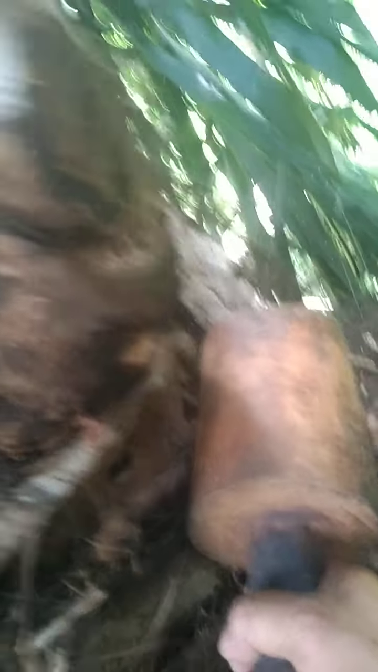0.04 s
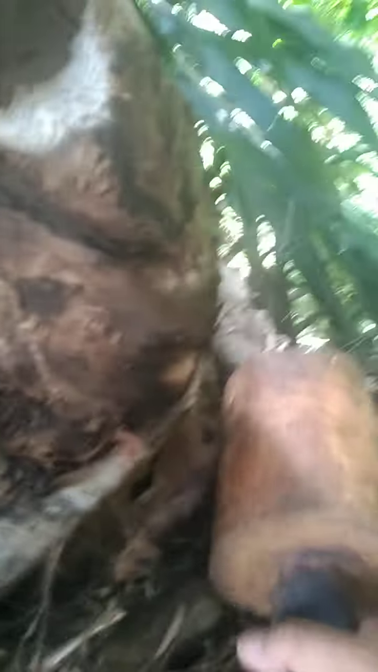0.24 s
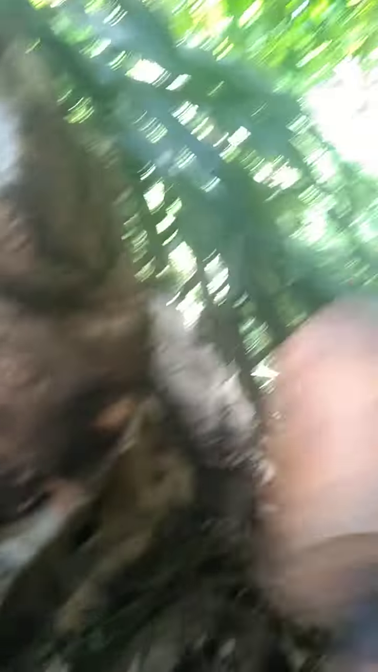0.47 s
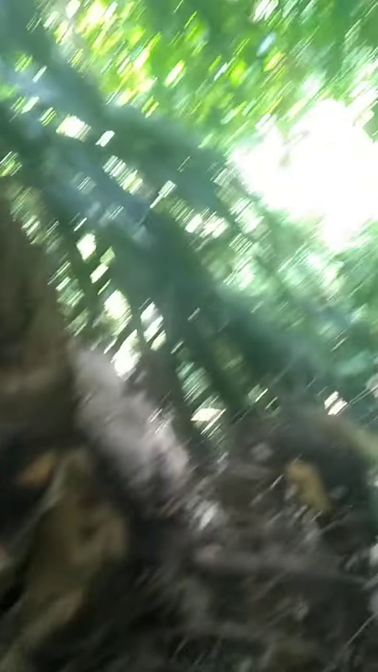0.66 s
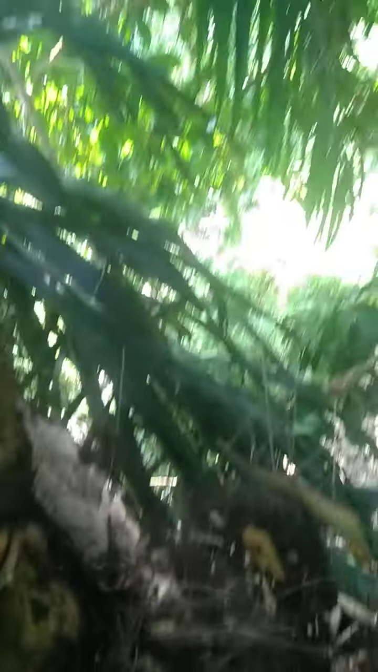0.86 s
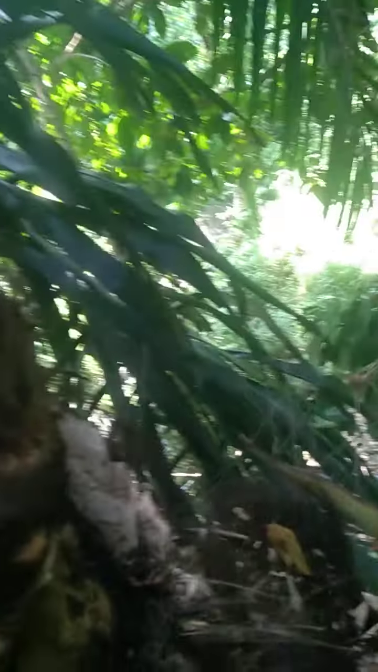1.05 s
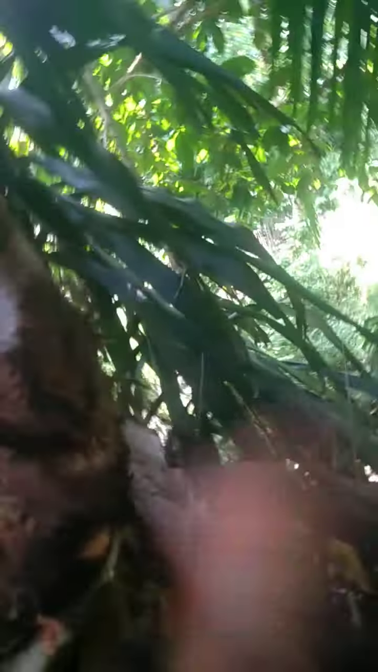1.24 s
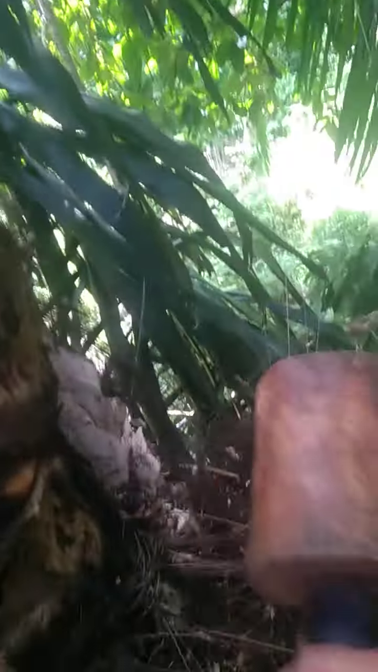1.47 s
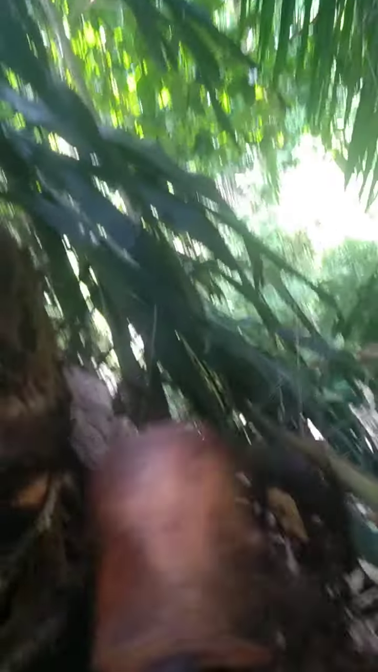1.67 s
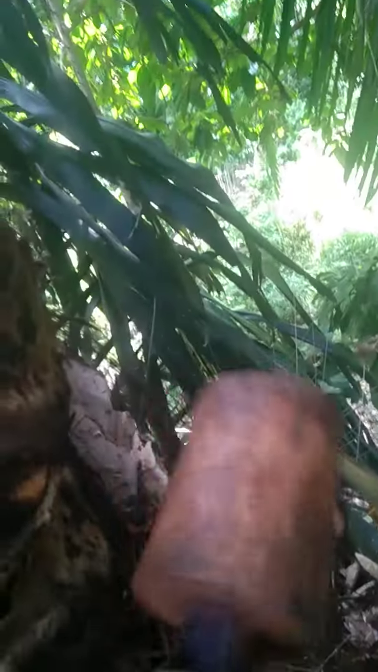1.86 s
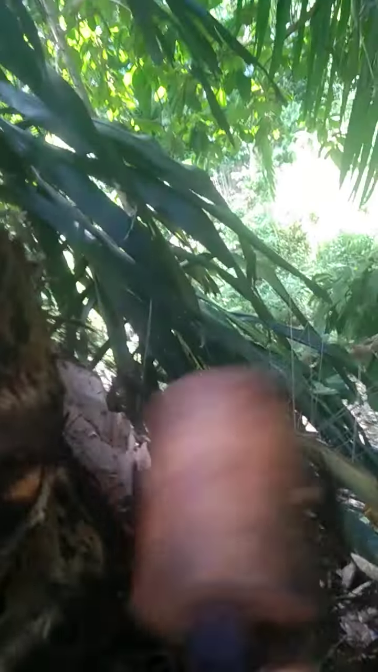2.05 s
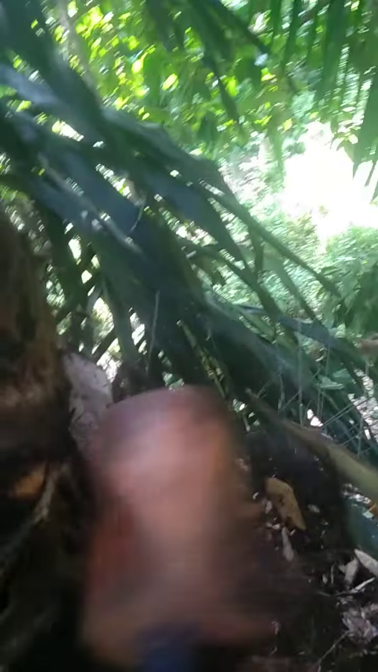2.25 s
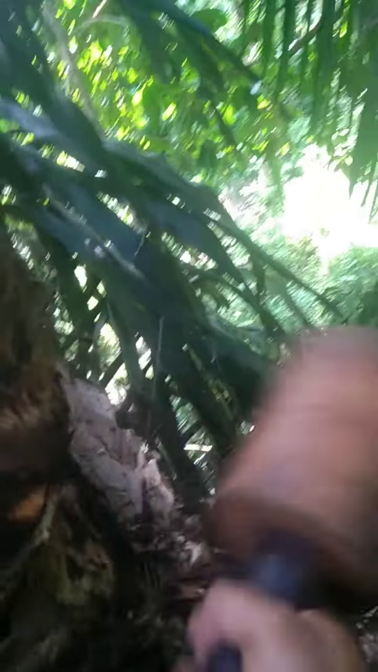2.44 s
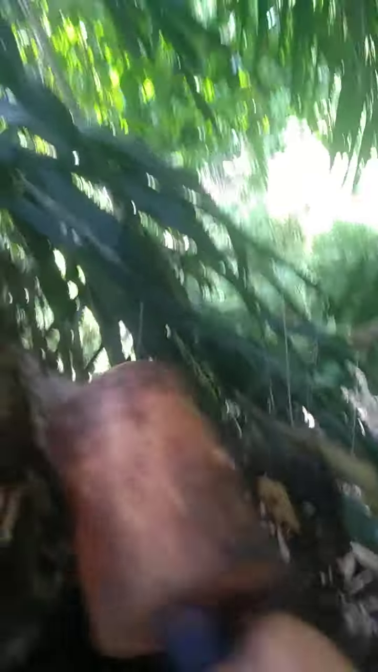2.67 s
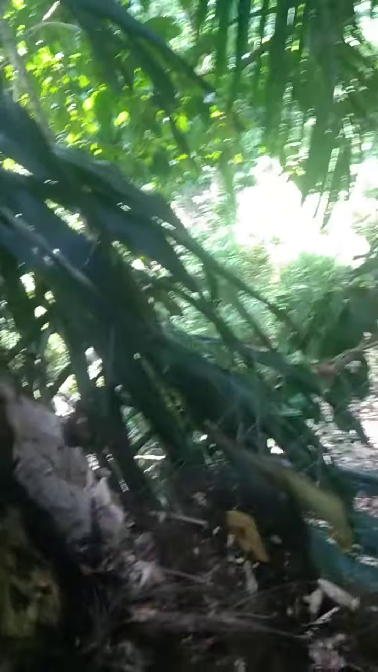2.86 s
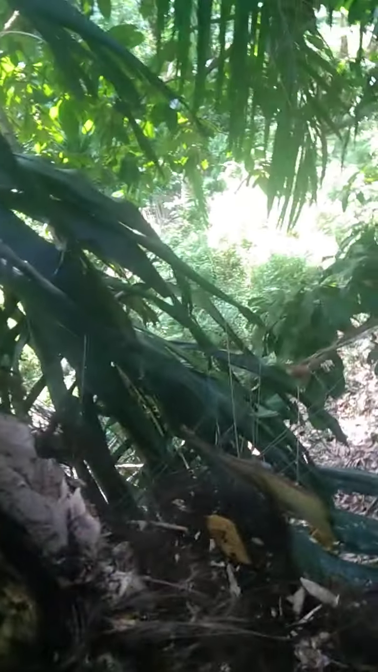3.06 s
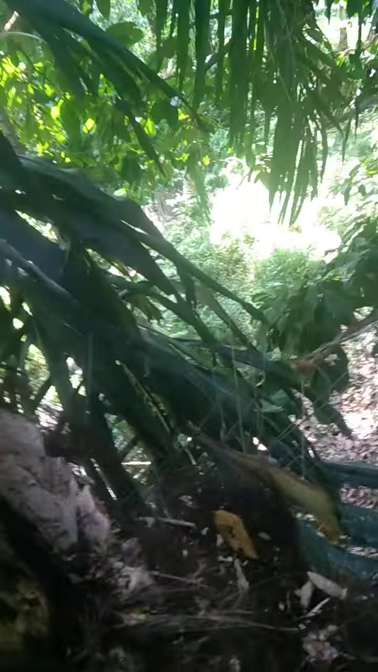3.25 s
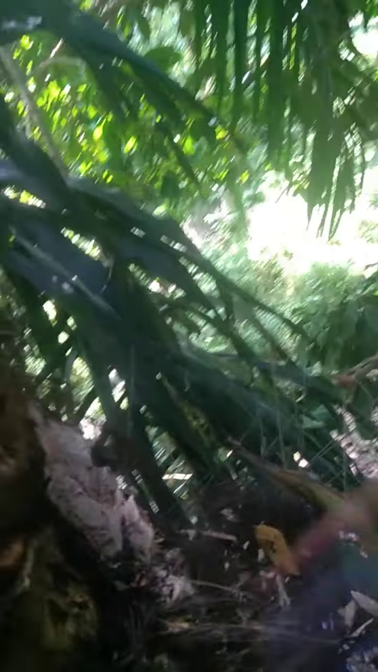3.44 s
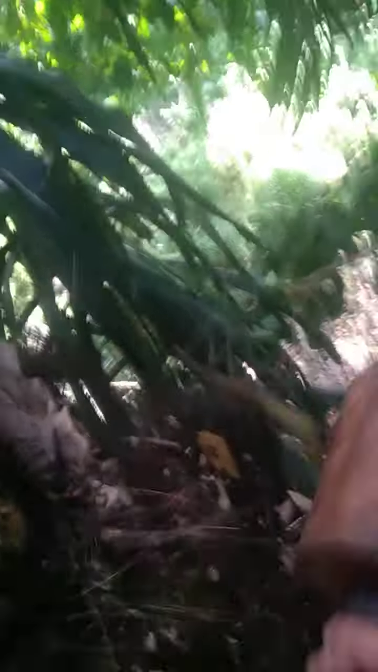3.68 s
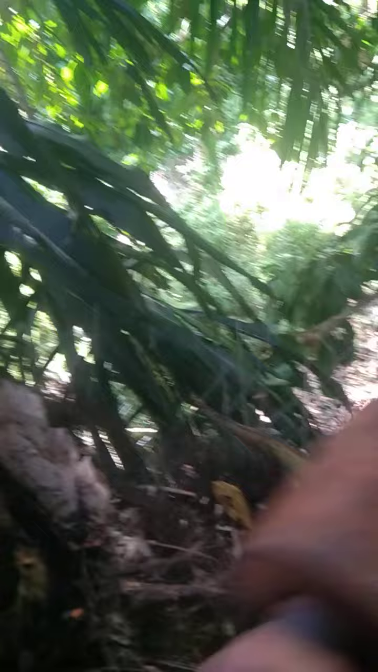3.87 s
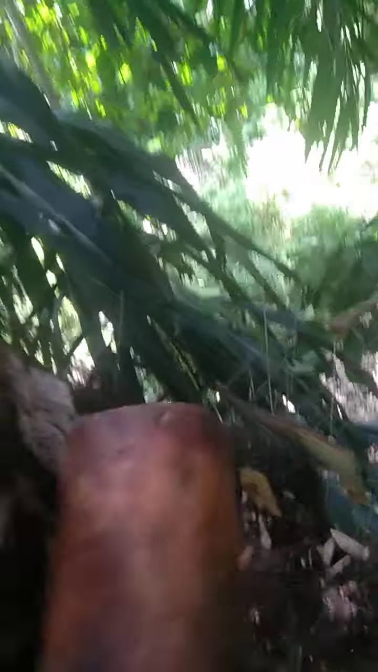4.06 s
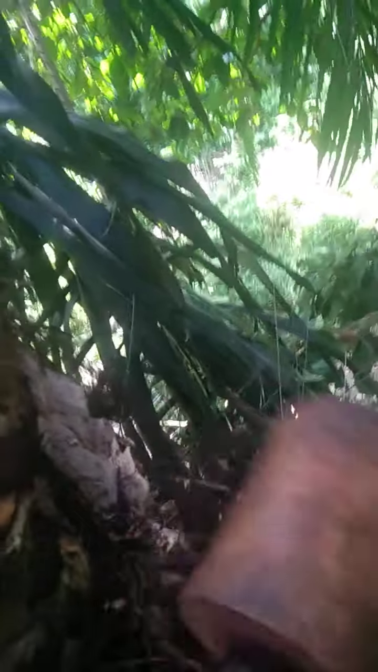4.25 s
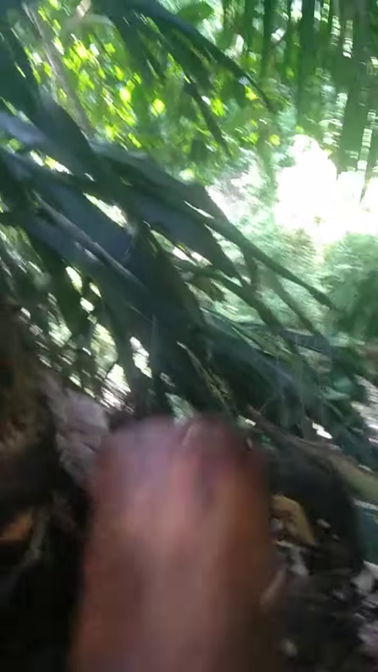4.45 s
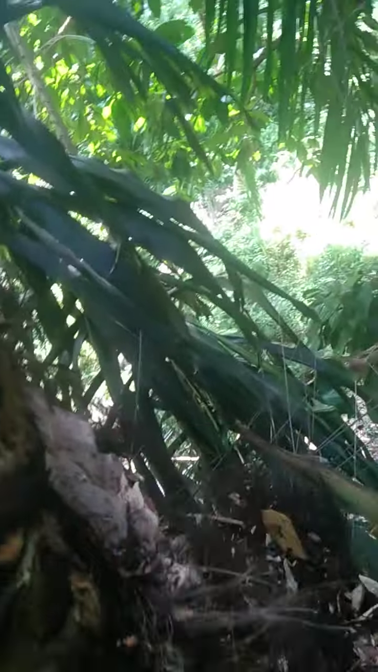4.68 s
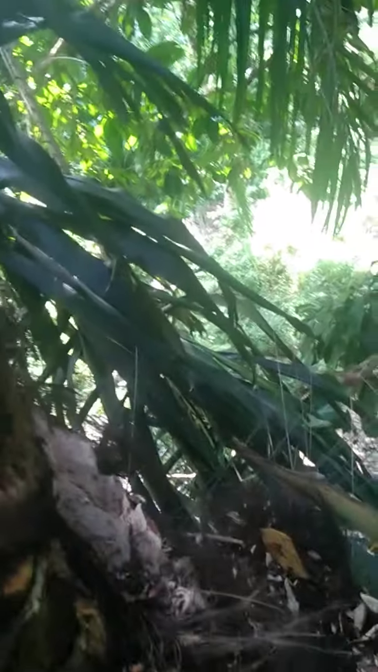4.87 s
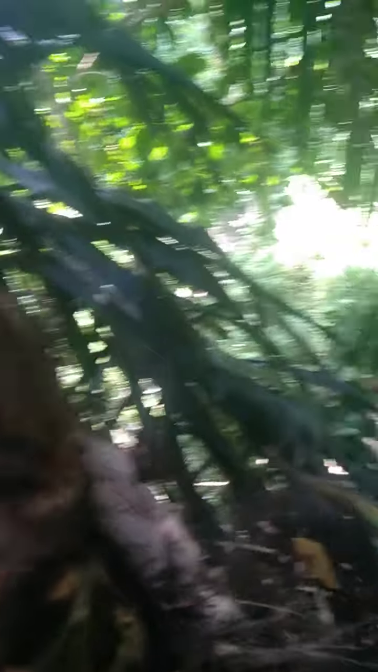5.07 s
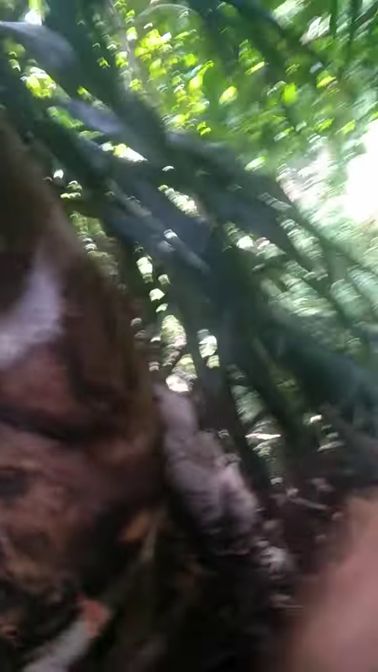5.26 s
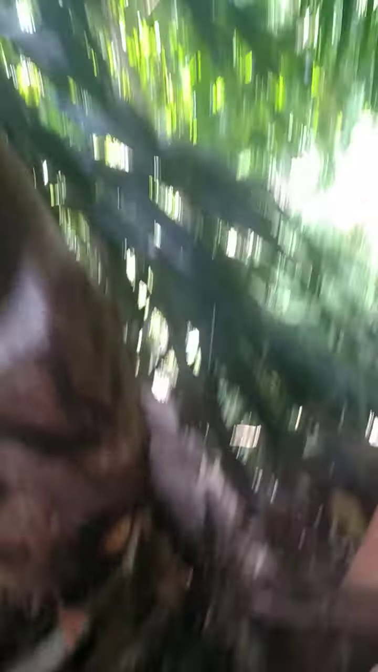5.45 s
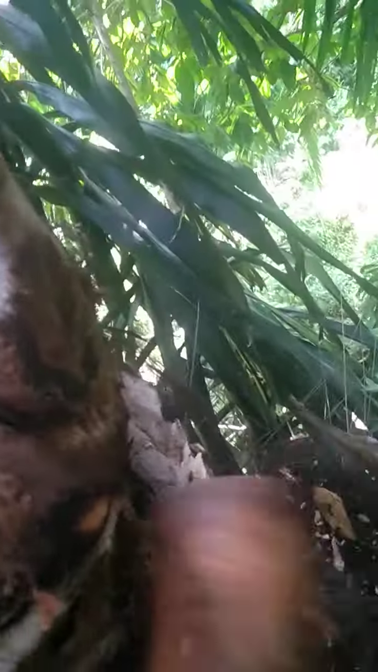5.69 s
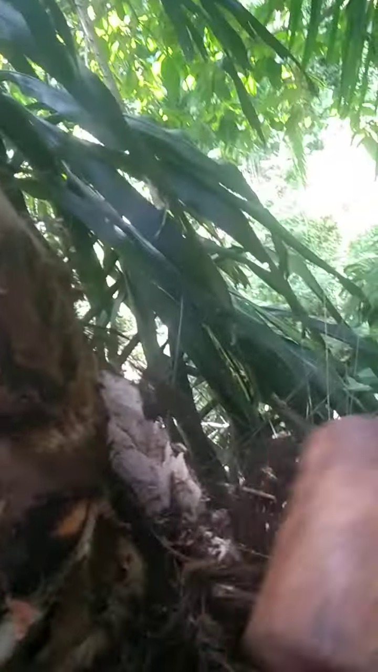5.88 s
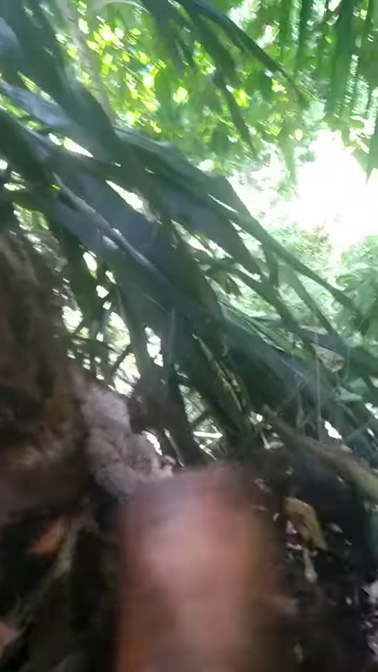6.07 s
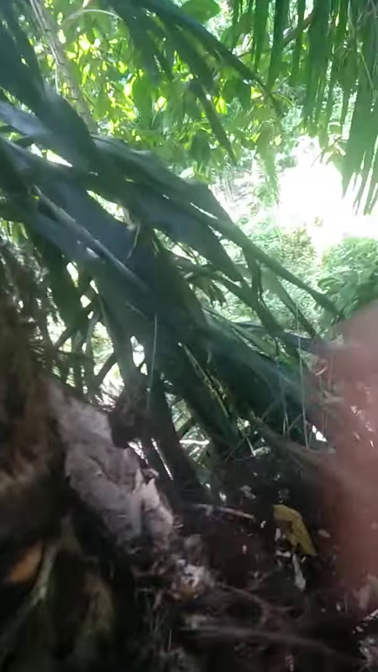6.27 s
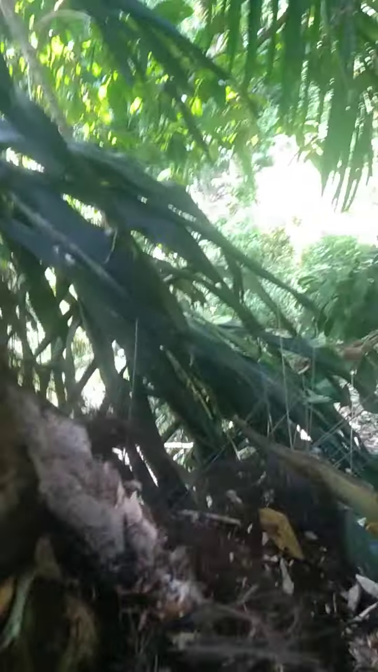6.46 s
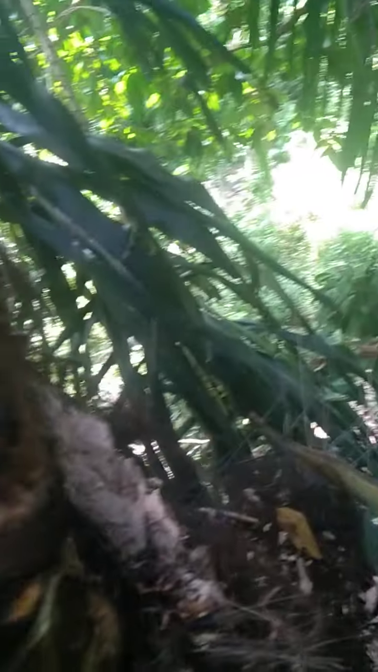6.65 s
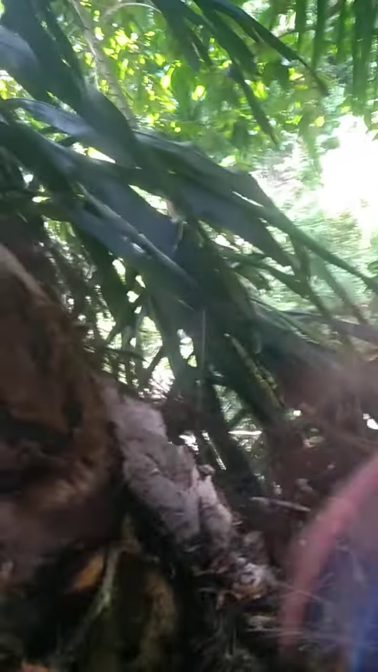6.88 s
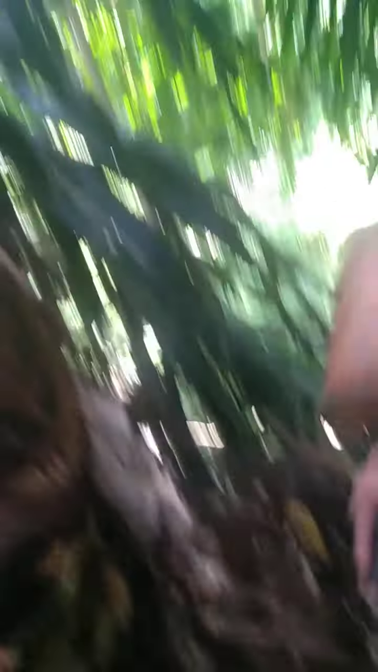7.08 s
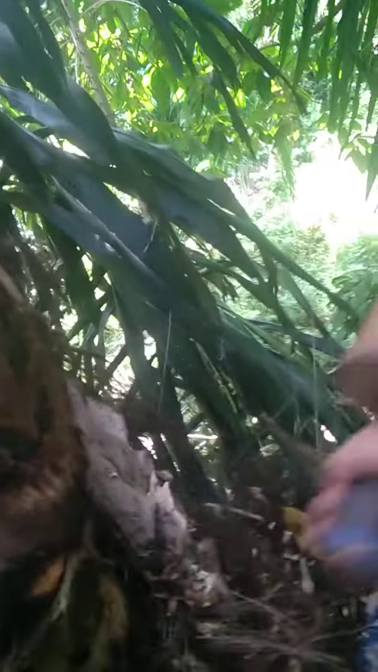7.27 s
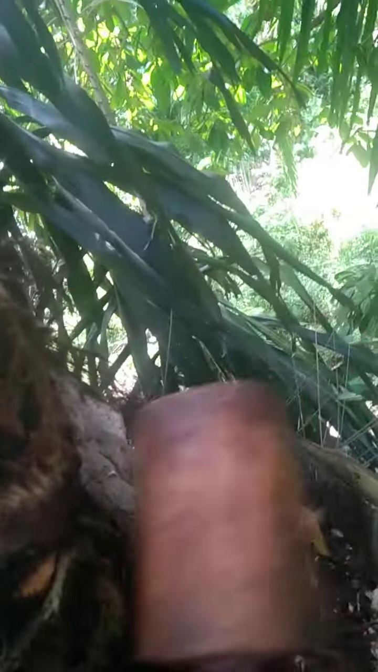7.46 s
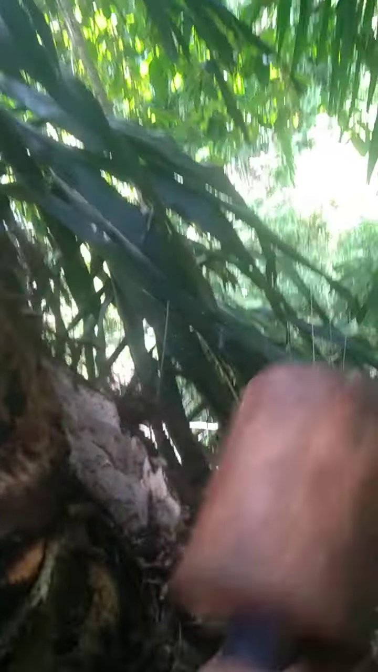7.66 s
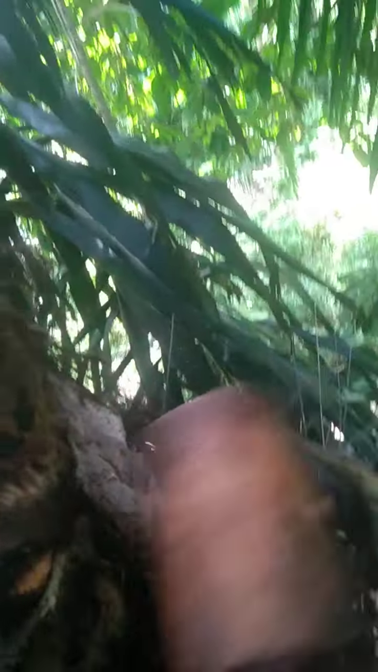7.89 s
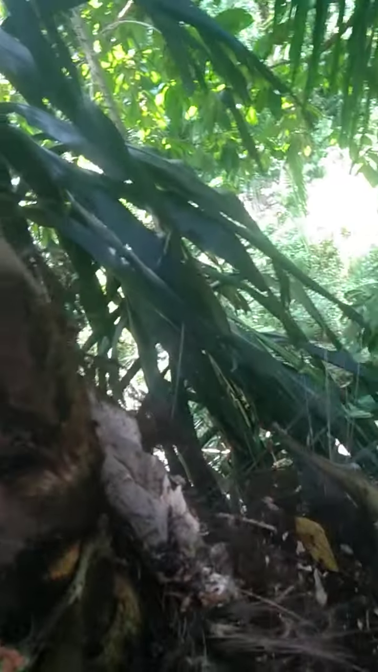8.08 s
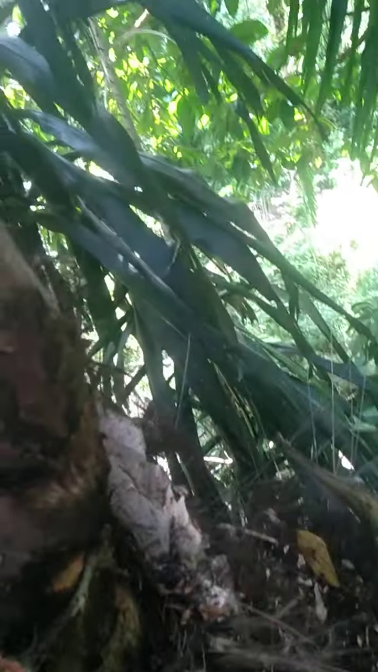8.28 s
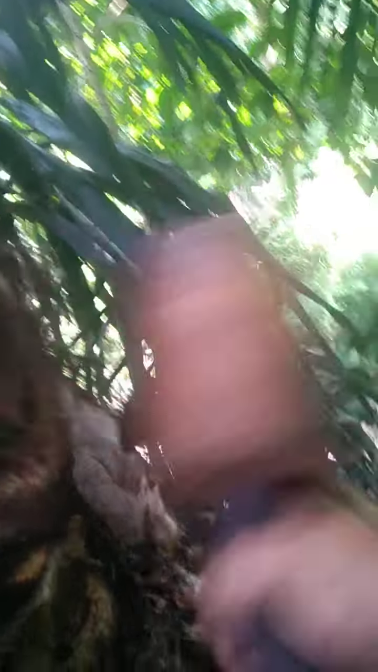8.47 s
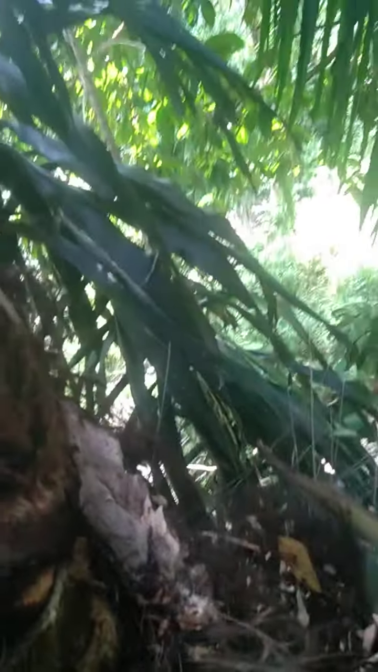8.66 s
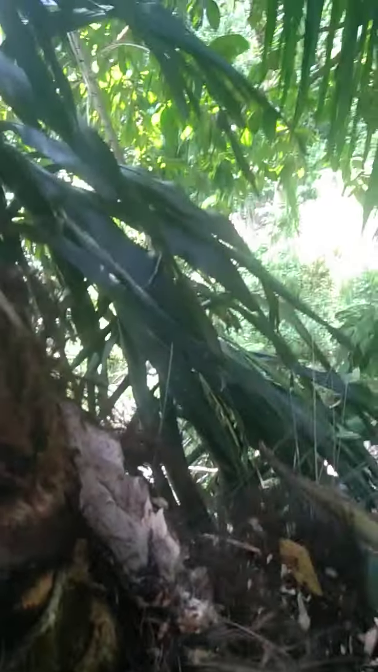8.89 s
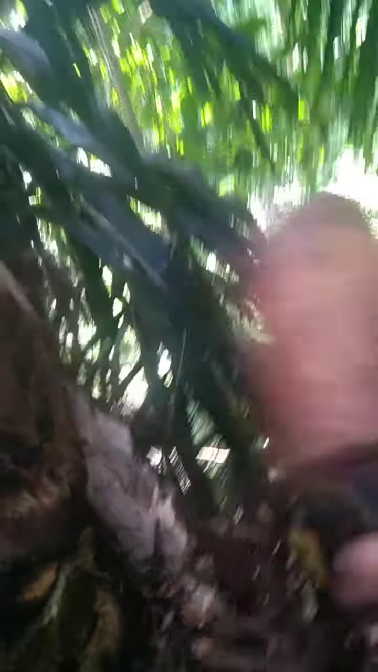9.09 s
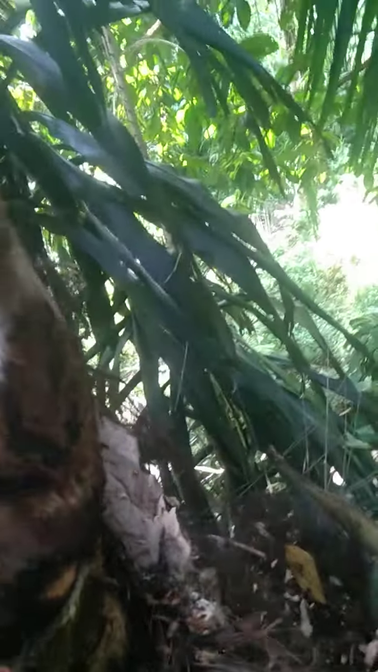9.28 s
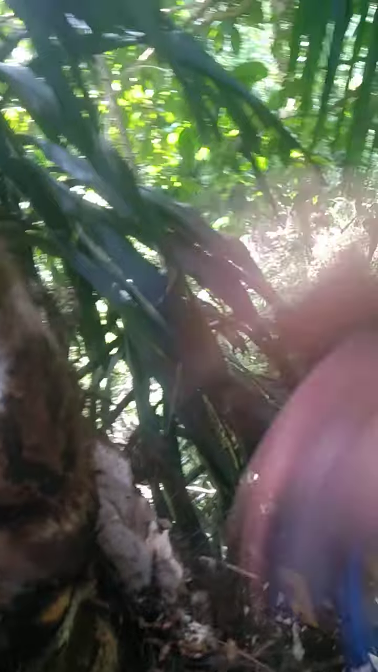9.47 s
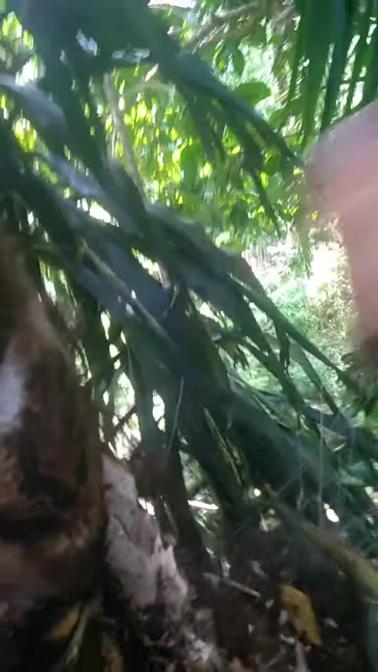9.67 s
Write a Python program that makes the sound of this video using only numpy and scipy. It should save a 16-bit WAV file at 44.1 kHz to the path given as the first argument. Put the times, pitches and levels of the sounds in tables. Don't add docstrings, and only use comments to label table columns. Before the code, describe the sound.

A constant high cicada hiss fills a leafy grove, with a faint cricket trill and a few hoarse falling bird calls at the start. After brief leaf rustles, a wooden mallet strikes a palm stalk close by, seventeen short hollow knocks in uneven groups, some dull, some cracking hard. Trunks return quick echoes. A hand-held phone overloads on hard hits, its background dipping and recovering.

```python
import sys
import numpy as np
from scipy import signal
from scipy.fft import rfft, irfft
from scipy.io import wavfile
from scipy.ndimage import uniform_filter1d

SR = 44100
rng = np.random.default_rng(int(sys.argv[2]) if len(sys.argv) > 2 else 0)


def wrap_up_sound(samples):
    columns = np.atleast_2d(samples).T
    tamed = np.clip(columns, -1, 1)
    steps = np.round(tamed * 32767).astype(np.int16)
    wavfile.write(sys.argv[1], SR, steps)


def attenuation_scalar(level_db):
    decades = np.asarray(level_db, float) / 20
    return 10 ** decades


N = 429093

# start in seconds, strength in dB, stalk pitch as a factor,
# level of the upper tones in dB, level of the fibre crack in dB.
BLOWS = [(1.3559, 16.5, 0.98, -4, -13), (1.7844, 9.5, 0.93, -17.5, -24), (2.0791, 6, 0.85, -23.5, -29),
         (2.3712, 5, 0.97, -7.5, -24), (2.685, 9.5, 1.017, -9.5, -17), (3.6095, 20, 1.136, -4, -16),
         (4.103, 9.5, 0.95, -12.5, -28), (4.5307, 4.5, 0.89, -9, -21.5), (5.3444, 14, 1.01, -1.5, -8),
         (5.809, 7.5, 0.91, -17.5, -26), (6.1761, 6.5, 0.98, -13.5, -22), (7.0542, 16, 0.96, -2, -11),
         (7.5270, 12, 1.042, -14, -27.5), (7.8739, 5, 0.87, -7, -19), (8.558, 10, 0.75, -6.5, -15),
         (9.1101, 7.5, 0.73, -7, -12), (9.6486, 9, 0.652, -10, -11.5)]


def evened(x):
    return x / np.sqrt(np.mean(x ** 2) + 1e-20)


def read(points, hz):
    f, value = np.transpose(points)
    return np.interp(np.log(hz + 1), np.log(f + 1), value)


def add(mix, s, sound):
    at = round(s * SR)
    part = mix[max(at, 0):][:len(sound) + min(at, 0)]
    part += sound[max(-at, 0):][:len(part)]


def resonate(x, hz, width):
    turn = np.exp(2j * np.pi * np.cumsum(hz * np.ones(len(x))) / SR)
    r = np.exp(-np.pi * width / SR)
    return 2 * (turn * signal.lfilter([1 - r], [1, -r], x / turn)).real


def coloured(x, points):
    return irfft(rfft(x) * attenuation_scalar(read(points, np.fft.rfftfreq(len(x), 1 / SR))), len(x))


def drift(top_hz):
    t = np.arange(0, N, 200) / SR
    wave = 0
    for f in np.geomspace(top_hz / 20, top_hz, 24):
        wave = wave + np.sin(2 * np.pi * (f * t + rng.random())) / np.sqrt(f)
    return np.interp(np.arange(N) / SR, t, evened(wave))


def air():
    # pitch in Hz, level in dB per Hz.
    wind_colour = [(18, -37.5), (30, -15.5), (157, -4), (461, -14), (700, -19.5), (1190, -15.5),
                   (1450, -21), (2350, -21), (3000, -27), (3420, -25), (5800, -15.5), (7540, -50),
                   (12800, -120)]
    frames, hz = N // 256 + 5, np.fft.rfftfreq(1024, 1 / SR)
    a, b, patches = rng.standard_normal((frames, 513, 3)).T
    patches = evened(uniform_filter1d(uniform_filter1d(patches, 4, 0), 40, 1))
    fade_db = read([(5800, -5.5), (9000, -14.5), (16000, -22.0)], hz)
    level_db = read(wind_colour, np.minimum(hz, 5700)) + fade_db
    z = (a + 1j * b) * attenuation_scalar(level_db[:, None] + 3.7 * patches)
    hiss = signal.istft(z, nperseg=1024, noverlap=768)[1][:N]
    return attenuation_scalar(-48.5) * evened(hiss)


def cicadas():
    clicks = (rng.random(N) < 2600 / SR) * attenuation_scalar(4.1 * rng.standard_normal(N))
    blur = 0.32 * rng.standard_normal(N)
    hz = np.fft.rfftfreq(N, 1 / SR)
    body = np.exp(-((hz - 7050) / 560) ** 2)
    body += attenuation_scalar(-30.5) * np.exp(-((hz - 8300) / 700) ** 2)
    song = evened(irfft(rfft(clicks + blur) * body, N))
    song = song * attenuation_scalar(0.9 * drift(5.3) + 0.4 * drift(1.0))
    doubled = evened(song ** 2) + 3.5 * evened(blur)
    overtone = irfft(rfft(doubled) / (1 + ((hz - 14400) / 1250) ** 6), N)
    return attenuation_scalar(-29.5) * (song + attenuation_scalar(-16.5) * evened(overtone))


def cricket():
    throb = 2.5 + np.cos(np.pi * np.cumsum(48 * (1 + 0.18 * drift(4.1))) / SR) ** 2
    tone = resonate(resonate(rng.standard_normal(N), 4600, 280), 4600, 280)
    level_db = -62 + 3.0 + 3.0 * drift(7.5)
    return attenuation_scalar(level_db) * evened(tone * throb)


def note(length, hz0, hz1, db, blur_hz, partials):
    t = np.arange(round(length * SR)) / (length * SR)
    noise = rng.standard_normal(len(t))
    out = 0
    for lag, echo in [(1.05, 1), (0.5, 0.6), (0.08, 0.85)]:
        travelled = 0.3 * t + 0.72 / (1 + np.exp((0.22 - t) / 0.045))
        glide = hz0 + lag * (hz1 - hz0) * travelled
        noise = np.roll(noise, 999)
        for k, level_db in partials:
            tone = resonate(resonate(noise, k * glide, blur_hz), k * glide, blur_hz)
            out = out + echo * attenuation_scalar(level_db) * evened(tone)
    swell = np.sin(np.pi * t ** 0.59) ** 1.3
    return attenuation_scalar(db - 2.0) * out * swell


def birds():
    # start in seconds, length in seconds,
    # first pitch in Hz, last pitch in Hz, level in dB.
    hoarse_notes = [
        (-.05, 0.31, 3491, 3292, -49),
        (0.337, 0.3, 3850, 3460, -38.5),
        (0.62, 0.245, 3605, 3360, -41.5),
        (1.146, .24, 3785, 3520, -37),
        (1.446, 0.37, 3570, 3360, -48),
    ]
    # start in seconds, length in seconds,
    # first pitch in Hz, last pitch in Hz, level in dB.
    thin_notes = [
        (0.869, 0.22, 8430, 8800, -38),
        (5.109, 0.2, 5240, 6700, -39),
        (5.286, .08, 4750, 5620, -41),
        (7.27, 0.2, 8580, 8060, -43.5),
        (9.24, 0.332, 8770, 8150, -42.5),
        (.5, 0.29, 2110, 2101, -62),
        (1.24, 0.14, 2110, 2092, -65),
        (2.16, 0.15, 2130, 2096, -56),
    ]
    out = np.zeros(N)
    for s, *row in hoarse_notes:
        add(out, s, note(*row, 85, [(0.5, -20.5), (1, -6.5), (1.5, -15)]))
    for s, length, hz0, hz1, db in thin_notes:
        blur_hz = 0.016 * hz0 + 0.17 * abs(hz1 - hz0)
        add(out, s, note(length, hz0, hz1, db, blur_hz, [(1, 0)]))
    return out


def brushed_leaves():
    # middle in seconds, length in seconds, swish in dB, crackle in dB.
    brushes = [(0.186, 0.0286, -58.5, -54), (0.21, 0.16, -53.5, -61), (0.319, 0.022, -47, -76),
               (0.879, 0.36, -56.5, -65), (1.053, 0.054, -56, -58), (2.96, 0.22, -64, -61),
               (3.145, 0.041, -55.5, -63), (3.221, 0.0087, -43.5, -57.5), (3.292, 0.033, -54.5, -50.5),
               (3.333, 0.037, -52, -64), (3.415, .016, -55, -59), (3.436, .016, -57, -54.5),
               (3.591, 0.11, -54, -54.5), (4.385, 0.147, -56.5, -68), (4.83, .12, -70, -64),
               (5.107, 1, -93, -69.5), (6.525, 0.048, -54, -51.5), (6.555, 0.015, -58, -49),
               (6.574, .04, -53, -47.5), (6.611, 0.057, -54.5, -54), (6.753, .35, -94, -71.5),
               (6.92, 0.14, -55.5, -60), (7.033, 0.051, -59, -60.5), (9.038, 0.36, -59, -75),
               (9.498, 0.68, -50.5, -72.5)]
    # pitch in Hz, level in dB.
    swish_colour = [(300, -8), (1200, -3), (2800, -4), (5000, -3.5), (7000, -7.5), (10000, -21.5)]
    # pitch in Hz, level in dB.
    crackle_colour = [(1500, -17.5), (4000, -21), (6000, 9), (9000, 4.5), (12000, -1), (16000, -0.5)]
    swish_level, crackle_level = np.zeros((2, N))
    for s, length, swish_db, crackle_db in brushes:
        arch = np.hanning(round(length * SR))
        add(swish_level, s - length / 2, attenuation_scalar(swish_db) * arch)
        add(crackle_level, s - length / 2, attenuation_scalar(crackle_db) * arch)
    rubbing = rng.standard_normal(N)
    swish = evened(coloured(rubbing, swish_colour))
    crackle = evened(coloured(rubbing[::-1], crackle_colour))
    return attenuation_scalar(7) * swish_level * swish + attenuation_scalar(18.5) * crackle_level * crackle


def snapping_stems():
    # start in seconds, peak level in dB, pitch in Hz.
    snaps = [(0.181, -30, 2620), (0.3082, -32, 2273), (1.0477, -30.5, 1520), (3.1292, -32, 1310),
             (3.2185, -42, 1486), (3.279, -24.5, 1300), (3.3252, -23.5, 1291), (3.534, -32.5, 925),
             (4.7598, -28, 4539), (6.879, -38, 1220), (6.9406, -31.5, 1291), (6.8808, -32.5, 3600),
             (6.916, -33, 3770)]
    out, t = np.zeros(N), np.arange(SR // 10) / SR
    for s, db, hz in snaps:
        burst = resonate(rng.standard_normal(len(t)), 3200, 4100)
        snap = 0.57 * np.sin(2 * np.pi * hz * t) + 0.39 * burst
        add(out, s, attenuation_scalar(db + 4.5 - 60 * t / 0.0169) * snap)
    return out


def bumps():
    # start in seconds, peak level in dB, pitch in Hz.
    thuds = [(0.19, -29.5, 142), (0.31, -24.5, 83.4), (3.137, -30.5, 59.2), (3.751, -16, 90.5),
             (5.454, -44.5, 56.5), (6.991, -39.5, 143.4), (4.413, -30.5, 436), (1.358, -19.5, 50),
             (3.612, -20.5, 60), (5.346, -17.5, 46), (7.056, -13, 48), (7.9, -26, 450), (9.8, -18.5, 100),
             (8.331, -40, 465)]
    out, t = np.zeros(N), np.arange(SR // 10) / SR
    for s, db, hz in thuds:
        fade = attenuation_scalar(db + 6.5 - 60 * t / 0.025)
        add(out, s, fade * np.sin(2 * np.pi * hz * t) * np.clip(t / 0.0024, 0, 1))
    return out


def blow(db, pitch, upper_db, crack_db, luck):
    # pitch in Hz, level in dB, time to fade by 60 dB in seconds.
    low_tones = [(131.37, -15, 0.04), (224, -10, 0.04), (325.6, 0.5, 0.019), (387.8, -9.5, 0.086),
                 (489.6, -1, 0.025), (540, -2.5, 0.027), (651.5, 0, 0.02754), (722, 1, 0.017)]
    # pitch in Hz, level in dB, time to fade by 60 dB in seconds.
    upper_tones = [(895, 3.5, 0.024), (997, 2.5, 0.016), (1129.7, 6, 0.026), (1345, 1.5, 0.021),
                   (1600.6, -1.5, 0.016), (1960, -16, 0.0044)]
    t = np.arange(SR // 2) / SR
    tones = list(low_tones) + [(hz, level + upper_db, t60) for hz, level, t60 in upper_tones]
    ring = np.zeros(len(t))
    for (hz, level, t60), a, b in zip(tones, luck[:14], luck[10:24]):
        fade = attenuation_scalar(level + 2.7 * a - 60 * t / t60)
        ring += fade * np.sin(2 * np.pi * hz * pitch * (1 + 0.019 * b) * (t - 0.0012))
    ring *= np.clip(t / 0.0029, 0, 1) ** 1.816 / 1.894
    direct = ring.copy()
    ring[168:] += 0.65 * direct[:-168]
    ring[322:] += 0.77 * direct[:-322]
    crack = np.zeros(len(t))
    crack[:400] = luck[24:424] * np.clip(t[:400] / 0.0018, 0, 1) * attenuation_scalar(-60 * t[:400] / 0.011)
    fronds = attenuation_scalar(-34.5 - 60 * t / 0.54) * np.clip(t / 0.024, 0, 1)
    crack += fronds * rng.standard_normal(len(t))
    crack = resonate(crack, 4200, 3400) + 0.5 * resonate(crack, 1900, 930)
    return attenuation_scalar(db) * (ring + attenuation_scalar(crack_db + 9.5) * resonate(crack, 3500, 6000))


def grove(x, sharp_db):
    # pitch in Hz, time to fade by 60 dB in seconds.
    haze_time = [(100, 0.089), (300, 0.759), (1000, 0.73), (2500, 0.51), (6000, 0.17), (12000, 0.18)]
    # pitch in Hz, level in dB.
    haze_colour = [(100, -12.5), (250, -15.5), (400, -17), (700, -21), (1200, -13.5), (2500, -12.5),
                   (5000, -29.5), (9000, -7)]
    # level in dB, pitch in Hz, width in Hz.
    wall_tone = (-14.5, 1370, 1200)
    # first echo in seconds, depth in seconds.
    wall_time = (.020, .038)
    size = 3 * SR // 4
    taps = np.zeros(size)
    at = np.arange(200, size - 20, 20) + rng.integers(0, 20, (size - 201) // 20)
    taps[at] = rng.choice([-1., 1.], len(at))
    hz, t, z = signal.stft(taps, SR, nperseg=256)
    z = z * attenuation_scalar(-60 * t / read(haze_time, hz)[:, None])
    haze = signal.istft(z, SR, nperseg=256)[1][:size]
    delay, depth = wall_time
    db, wall_hz, width = wall_tone
    db = db + 0.25 * sharp_db
    wall_hz, width = wall_hz * attenuation_scalar(0.1 * sharp_db), width * attenuation_scalar(0.16 * sharp_db)
    u = (np.arange(size) / SR - delay) / depth
    swell = np.clip(4 - 4 * u, 0, 1) * np.clip(u, 0, 1) ** 0.043
    wall = resonate(resonate(taps * swell, wall_hz, width), wall_hz, width)
    haze = coloured(haze / np.linalg.norm(haze), haze_colour)
    echoes = haze + attenuation_scalar(db) * wall / np.linalg.norm(wall)
    front = x * np.exp(-np.arange(len(x)) / SR / 0.0024)
    front = front * np.linalg.norm(x) / np.linalg.norm(front)
    return signal.fftconvolve(front + 0.09 * x, echoes)


def mallet():
    out, luck = np.zeros(N), rng.standard_normal((len(BLOWS), 424))
    for (s, db, pitch, upper_db, crack_db), row in zip(BLOWS, luck):
        knock = blow(db, pitch, upper_db, crack_db, row)
        add(out, s, knock)
        low = min(pitch, 1) - 1
        echo_db = 0.42 * crack_db + 0.09 * upper_db + 5.0 + 14.0 * low
        sharp_db = min(db + crack_db, 0) + 30.0 * low
        add(out, s, attenuation_scalar(echo_db) * grove(knock, sharp_db))
    return out


def scene():
    forest = air() + cicadas() + cricket() + birds()
    near = brushed_leaves() + snapping_stems() + bumps() + mallet()
    return (forest + near)[None]


def gain_control(x):
    t = np.arange(N) / SR
    slow_t = t[::16]
    cut_db = np.zeros(N // 16 + 1)
    for s, db, *_, crack_db in BLOWS:
        duck_db = np.clip(0.5 + 0.8 * (db + crack_db + 12), 0.5, 14)
        duck_db += 0.86 * cut_db[round(s * SR) // 16]
        u = np.maximum(slow_t - s, 0)
        drop = 0.62 * (1 - np.exp(-(u / 0.014) ** 2)) + 0.38 * (1 - np.exp(-u / 0.08))
        recovery_db = 17.95 * np.maximum(u - 0.15, 0)
        cut_db = np.maximum(cut_db, duck_db * drop - recovery_db)
    return x * np.interp(t, slow_t, attenuation_scalar(-cut_db))


def late_limiter(x):
    fall = np.arange(N) / SR * 200
    peak_db = 20 * np.log10(abs(x) + 1e-6)
    over_db = np.maximum(np.maximum.accumulate(peak_db + fall) - fall + 6, 0)
    over_db = uniform_filter1d(over_db, 501, origin=250)
    return x * attenuation_scalar(-0.55 * over_db)


def drop_faint(x):
    # pitch in Hz, level in dB.
    quietest = [(1500, -66), (2200, -68.5), (3200, -69), (5000, -63.5), (8500, -72), (9500, -78),
                (12000, -84), (14000, -69.5), (16000, -68)]
    hz, _, z = signal.stft(x, SR, nperseg=1024, noverlap=768)
    band = uniform_filter1d(uniform_filter1d(abs(z) ** 2, 6, 0), 7, 1) * 100
    above_db = 10 * np.log10(band + 1e-14) - read(quietest, hz)[:, None]
    z *= np.clip(above_db / 5, 0, 1)
    return signal.istft(z, nperseg=1024, noverlap=768)[1][None, :N]


def roll_off(x):
    return signal.sosfilt(signal.butter(12, 16500, fs=SR, output="sos"), x)


def record(dry):
    # pitch in Hz, level in dB.
    mic_colour = [(20, -33), (45, -11), (90, 1.5), (5000, -3.5), (8000, -11), (10000, -16), (16200, -21.5),
                  (16800, -52.5)]
    clipped = np.clip(gain_control(dry[0]), -0.8, 0.8)
    heard = coloured(late_limiter(clipped), mic_colour)
    return roll_off(drop_faint(heard))


dry = scene()
out = record(dry)
wrap_up_sound(out)
```